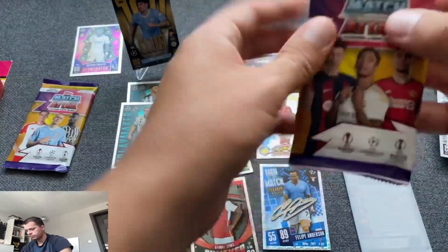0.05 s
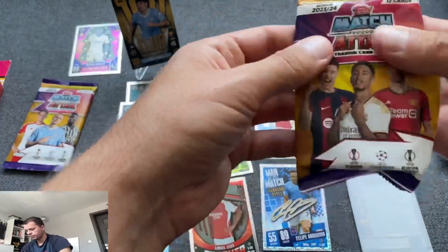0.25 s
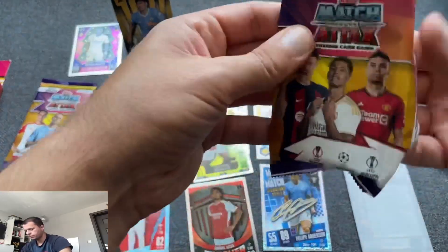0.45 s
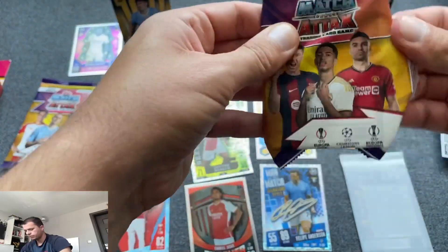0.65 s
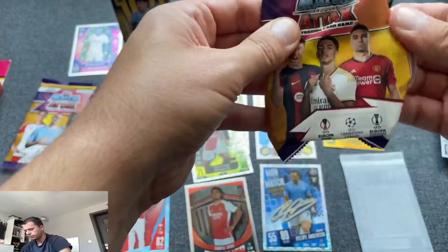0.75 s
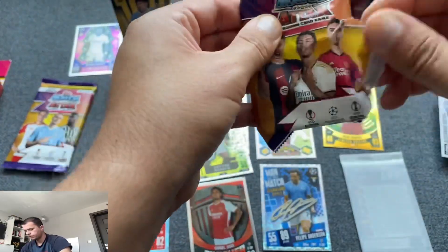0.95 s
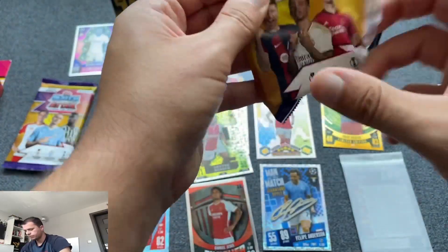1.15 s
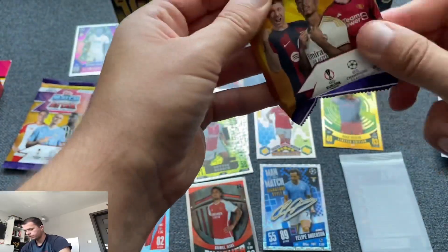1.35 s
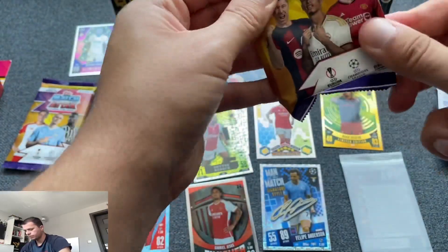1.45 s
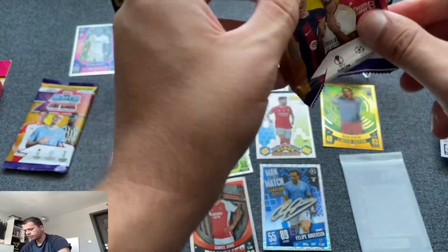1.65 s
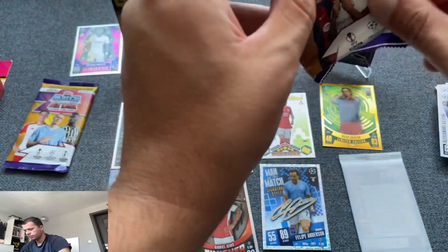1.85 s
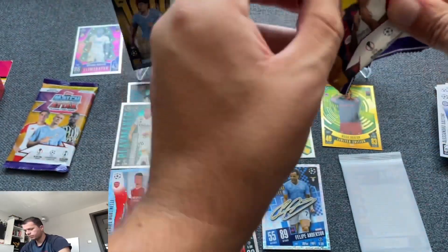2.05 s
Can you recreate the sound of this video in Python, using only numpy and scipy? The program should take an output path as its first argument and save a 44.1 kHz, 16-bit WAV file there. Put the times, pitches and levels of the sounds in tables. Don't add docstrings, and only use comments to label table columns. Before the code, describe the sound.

A foil packet crinkles and tears in the fingers, sharp irregular crackles close up in a quiet room

```python
import sys
import numpy as np
from scipy import signal
from scipy.fft import rfft, irfft, next_fast_len
from scipy.io import wavfile
from scipy.ndimage import uniform_filter1d

SR = 44100
rng = np.random.default_rng(int(sys.argv[2]) if len(sys.argv) > 2 else 0)


def volts(x):
    e = np.asarray(x, float) / 20
    return 10 ** e


def inscribe(sig):
    pcm = np.round(np.clip(np.atleast_2d(sig).T, -1, 1) * 32767)
    wavfile.write(sys.argv[1], SR, pcm.astype(np.int16))


N = 92610


def unit(x):
    return x / np.sqrt(np.mean(x ** 2) + 1e-20)


def along(points, hz):
    f, value = np.transpose(points)
    return np.interp(np.log(hz + 1), np.log(f + 1), value)


def over_time(points):
    return volts(np.interp(np.arange(N) / SR, *np.transpose(points)))


def filtered(x, response):
    size = next_fast_len(x.shape[-1] + 4096)
    return irfft(rfft(x, size) * response(np.fft.rfftfreq(size, 1 / SR)), size)[..., :x.shape[-1]]


def placed(starts, shapes):
    first = np.round(starts * SR).astype(int)[:, None]
    at = np.clip(first + np.arange(shapes.shape[-1]), 0, N)
    return np.array([np.bincount(at.ravel(), s.ravel(), N + 1)[:N] for s in shapes])


def ring(f, centre, wide):
    return 1j * f * centre * wide / (centre * centre - f * f + 1j * f * centre * wide)


# t/s, level/dB, colour f/Hz
GRIP_SNAPS = [(0.0896, -30, 3020), (0.0907, -38, 3050), (0.0939, -33.5, 4540), (0.2205, -29, 8400),
              (0.2378, -19.5, 7100), (0.2399, -28, 6500), (0.246, -23, 5000), (.2515, -21, 3000),
              (.255, -26, 4500), (.2608, -24, 6960), (0.2671, -16, 11600), (.2729, -26, 8200),
              (0.2907, -22.5, 1940), (0.397, -26, 6700), (.4167, -22, 3630), (0.423, -39, 4000),
              (0.4289, -34, 4500), (0.4398, -32, 3050), (0.4362, -23, 5740), (0.4902, -27, 8320),
              (0.4973, -28, 3300), (0.5121, -36, 2540), (0.5158, -22, 6800), (0.56, -21.5, 6760),
              (.6011, -27, 2820), (0.6064, -34, 3650), (0.6166, -23.5, 2640), (0.6237, -25, 4000),
              (0.6245, -22.5, 2330), (0.6277, -15, 4240), (0.6275, -16, 10700), (0.6423, -23.5, 4630),
              (0.6516, -22.5, 4470), (0.6552, -29, 5000)]
# t/s, level/dB, colour f/Hz
TEAR_SNAPS = [(.7298, -35.5, 6530), (0.7384, -32.5, 2510), (0.7472, -31, 5300), (0.766, -30, 8400),
              (0.776, -19, 4160), (0.7841, -12.5, 8500), (0.8245, -18.5, 5980), (0.8321, -17.5, 6100),
              (0.842, -26, 5900), (.8474, -31.5, 7280), (0.856, -36, 6900), (.861, -13.5, 6360),
              (0.8697, -18, 7400), (0.8893, -17.5, 4100), (0.8952, -19.5, 5000), (0.9, -27, 6500),
              (0.9094, -24.5, 4770), (0.9298, -19, 6700), (0.9403, -21.5, 4580), (0.9456, -13, 4000),
              (0.9482, -7, 3630), (0.9598, -16, 5900), (.9672, -22, 6700), (0.985, -34.5, 6400),
              (1.0232, -30.5, 2390), (1.0291, -17, 12600), (1.0297, -26, 1480)]
# t/s, level/dB, colour f/Hz
TURN_SNAPS = [(1.0943, -30, 6850), (1.0965, -37.5, 1500), (1.126, -27, 7600), (1.13, -29, 6840),
              (1.144, -32, 3000), (1.0565, -53, 3000), (1.069, -39, 7200), (1.084, -38, 4400),
              (1.121, -36.5, 1780), (1.165, -39.5, 1290), (1.1913, -23, 8300), (1.2521, -31.5, 5100),
              (1.2579, -33, 5300), (1.2605, -21, 5900), (1.3061, -23.5, 6500), (1.3527, -29, 5400),
              (1.3588, -34, 6600), (1.5182, -20.5, 9000), (1.5238, -24, 7100), (1.5499, -25.5, 8300),
              (1.619, -36, 6470), (1.6336, -22.5, 5750), (1.6575, -33, 2080), (1.7151, -37, 2240),
              (1.7314, -28, 3530), (1.738, -32, 2900), (1.7482, -22, 4100), (1.7495, -27.5, 2920),
              (1.7636, -28.5, 5730), (1.7782, -25.5, 4970), (1.8898, -32.5, 3220), (1.8964, -34, 6350),
              (1.9348, -25, 3980), (2.0574, -32, 6150)]
# t/s, level/dB, colour f/Hz
FAINT_TICKS = [(0.1314, -39.5, 4700), (.181, -44, 7100), (0.1916, -41.5, 2080), (.3373, -36, 6140),
               (0.3518, -30, 2720), (.3561, -35, 2600), (0.3593, -34, 5560), (0.3697, -30.5, 3660),
               (0.3811, -44, 1590), (.4096, -44, 5000), (.4682, -35.5, 2530), (.5291, -32, 1800),
               (0.663, -34, 1800), (0.7515, -35.5, 6260), (1.485, -51, 1170), (1.607, -46.5, 2600),
               (1.8739, -41.5, 1290), (2.0097, -45, 1480), (2.036, -48.5, 1510)]
# f/Hz, level/dB
FOIL_TONE = [(150, 5), (500, 3.5), (1500, 2), (4000, 0.5), (6500, -0.5), (9000, 2), (13000, 0.5),
             (16500, -6)]


def snaps():
    t60_s, rise_s, level_db = 0.008, 0.0003, -4.5
    panel_octaves, panel_wide, panel_db = 1.56, 0.13, -5
    start, db, hz = np.transpose(GRIP_SNAPS + TEAR_SNAPS + TURN_SNAPS + FAINT_TICKS)
    colour = hz[:, None]
    t = np.arange(512) / SR
    draw = rng.standard_normal((2, len(start), 513))
    away = panel_octaves * np.abs(draw[..., :1])
    low = np.clip(colour * 2 ** -away[0], 500, 15000)
    high = np.clip(colour * 2 ** away[1], 500, 15000)

    def tone(f):
        edge = 1.56 * colour
        thin = 1j * f / (0.16 * colour + 1j * f)
        flat = 0.31 * (edge / (edge + 1j * f)) ** 3 * thin
        panels = volts(panel_db) * (ring(f, low, panel_wide) + ring(f, high, panel_wide))
        return volts(along(FOIL_TONE, f)) * (flat + ring(f, colour, 1) + panels)

    burst = draw[..., 1:] * volts(-60 * t / t60_s) * (1 - np.exp(-t / rise_s))
    burst = filtered(burst, tone)
    early = np.sqrt(np.mean(burst[..., :44] ** 2, axis=-1, keepdims=True))
    return placed(start, volts(db + level_db)[:, None] * burst / early)


def grains(spectrum, hiss):
    grains_a_s, pitch_hz, spread, cycles, size_db = 3500, 5000, 0.917, 1.6, 22
    draw = rng.random((int(grains_a_s * N / SR), 6))
    t = np.arange(128) / SR
    octave = spread * 3.272 * (draw[:, 1] + draw[:, 2] - 1) / 1.497
    hz = np.clip(pitch_hz * np.exp(octave), 200, 16000)[:, None]
    size = volts(size_db * draw[:, 3:4] ** 2) * np.sqrt(hz)
    phase = draw[:, 4:].T[:, :, None]
    envelope = size * t * hz * np.exp(-t * hz / cycles * 2)
    shapes = envelope * np.sin(2 * np.pi * (hz * t + phase))
    mix = unit(placed(draw[:, 0] * N / SR, shapes)) + hiss * rng.standard_normal((2, N))
    return unit(filtered(mix, lambda f: volts(along(spectrum, f))))


def patchy(x):
    z = signal.stft(x, nperseg=256)[2]
    field = rng.standard_normal(z.shape[1:])
    field = uniform_filter1d(field, size=7, axis=0)
    field = uniform_filter1d(field, size=4, axis=1)
    patches = volts(3.5 * unit(field))
    return unit(signal.istft(z * patches, nperseg=256)[1][:, :N])


# centre t/s, half length t/s, level/dB
TEAR_SWELLS = [(0.094, 0.009, -44), (0.188, 0.019, -59.5), (0.22, 0.015, -50.5), (0.251, .014, -26),
               (0.278, 0.0088, -39), (0.293, 0.0073, -37), (0.341, 0.027, -39.5), (0.396, 0.0097, -37),
               (0.42, 0.015, -42), (0.485, 0.029, -43.5), (0.518, 0.0093, -46), (0.612, 0.015, -33),
               (0.631, 0.013, -38), (0.647, 0.021, -38.5), (0.719, 0.024, -56.5), (0.781, 0.015, -26.5),
               (0.826, 0.014, -29.5), (0.871, 0.012, -28), (0.904, 0.012, -30.5), (0.932, 0.0083, -35.5),
               (0.957, 0.011, -24)]
# centre t/s, half length t/s, level/dB
TURN_SWELLS = [(1.028, 0.0069, -39.5), (1.067, 0.02, -48.5), (1.133, 0.021, -45), (1.167, 0.015, -46),
               (1.204, 0.0071, -42), (1.258, 0.01, -38), (1.36, 0.0064, -48), (1.525, 0.0033, -33),
               (1.623, 0.022, -50), (1.644, 0.019, -35), (1.736, 0.0095, -36), (1.75, 0.0084, -40),
               (1.764, 0.008, -34), (1.781, 0.0045, -29.5), (1.889, 0.031, -51), (1.948, 0.0071, -47),
               (2.055, 0.0086, -41.5)]
# t/s, level/dB
GRIP_RUSTLE = [(0, -62), (.05, -67.5), (.16, -63.5), (.21, -73), (.32, -52), (.5, -45.5), (.55, -51.5),
               (.71, -63), (.8, -49), (1.05, -52.5), (1.2, -57), (1.36, -55.5), (1.44, -70.5),
               (1.49, -60.5), (1.85, -54.5), (1.99, -64.5), (2.1, -54)]
# f/Hz, level/dB
RUSTLE_TONE = [(60, 20), (250, 17), (1000, -1), (4000, -5.5), (9000, 3.5), (16000, -11)]
# t/s, treble level/dB
FOIL_FACING = [
    (.26, 7.5),
    (.6, -15),
    (.85, 7),
    (1.3, 3),
    (1.7, -5),
]


def crackle():
    facing_hz, rise_share = 4000, 0.75
    t = np.arange(N) / SR
    swells = np.zeros(N)
    for centre, half, db in TEAR_SWELLS + TURN_SWELLS:
        length = half * np.where(t < centre, rise_share, 1)
        swells += volts(db) * np.exp(-((t - centre) / length) ** 2)
    fine = swells * patchy(grains(FOIL_TONE, hiss=1))
    fine = fine + over_time(GRIP_RUSTLE) * grains(RUSTLE_TONE, hiss=0.63)
    dull = filtered(fine, lambda f: 1 / (1 + (f / facing_hz) ** 2))
    return dull + over_time(FOIL_FACING) * (fine - dull)


def pushes(table, cycles):
    out, t = np.zeros((2, N)), np.arange(N) / SR
    for centre, db, hz in table:
        turns = (t - centre) * hz
        swing = np.sin(2 * np.pi * (turns + rng.random((2, 1))))
        out += volts(db) * np.exp(-(turns / cycles) ** 2) * swing
    return out


# centre t/s, level/dB, pitch f/Hz
POUCH_PUFFS = [(.226, -28, 1930), (.2895, -24.5, 700), (.2925, -24.5, 650), (.304, -29, 1200),
               (.5957, -33.5, 910), (.778, -26, 660), (.789, -22.5, 438), (.862, -25, 545),
               (.949, -13.5, 1180), (.9802, -21.5, 1170), (1.024, -28.5, 404), (1.057, -35, 1200),
               (1.2035, -37.5, 342), (1.2063, -30, 1170), (1.3075, -30.5, 980), (1.31, -36, 400),
               (1.3461, -39, 1100), (1.5265, -31, 430), (1.658, -42, 1520), (1.778, -33.5, 870),
               (1.873, -45, 800), (1.935, -37, 1280), (1.95, -38, 1000), (2.028, -44, 825)]


def puffs():
    return pushes(POUCH_PUFFS, cycles=0.65)


# centre t/s, level/dB, pitch f/Hz
HAND_THUMPS = [(.005, -37.5, 55), (.03, -48.5, 60), (.13, -50, 65), (.35, -37.5, 151), (.425, -37.5, 90),
               (.445, -34.5, 143), (.486, -34.5, 109), (.498, -27, 78), (.636, -53, 103),
               (.792, -32.5, 126), (.903, -34.5, 143), (1.033, -33.5, 136), (1.082, -35.5, 221),
               (1.17, -37, 206), (1.206, -48, 65), (1.265, -37.5, 200), (1.272, -38, 92.4),
               (1.641, -40, 152.5), (1.761, -40, 122), (1.916, -41, 143), (2.068, -40.5, 184)]


def thumps():
    return pushes(HAND_THUMPS, cycles=0.38)


# f/Hz, time to fall 60 dB t/s
WALL_T60 = [(300, 0.17), (12000, 0.17)]


def walls(x):
    stretch, delay = 8192, 90
    out = np.zeros((2, N + SR))
    for start in range(0, N, stretch):
        hz, t, z = signal.stft(rng.standard_normal((2, SR // 4)), SR, nperseg=256)
        fade = volts(-60 * t / along(WALL_T60, hz)[:, None])
        tail = signal.istft(z * fade, SR, nperseg=256)[1]
        wet = signal.fftconvolve(x[:, start:start + stretch], tail / np.linalg.norm(tail[0]), axes=1)
        out[:, start + delay:start + delay + wet.shape[1]] += wet
    return volts(-14.5) * out[:, :N]


# f/Hz, level/dB
ROOM_COLOUR = [(60, 16), (200, -21), (800, -42.5), (16000, -24)]


def room_tone():
    noise = rng.standard_normal((2, N))
    return volts(-66) * unit(filtered(noise, lambda f: volts(along(ROOM_COLOUR, f))))


# f/Hz, phase [radians]
PORT_TURN = [(2000, .1), (2900, 1), (5000, 1), (5800, -1.2), (7800, -2.95), (9700, -3.4), (12900, -6.1),
             (16500, -6.3)]


def ports(pair, alike):
    def shares(hz):
        half = np.arccos(np.clip(along(alike, hz), 0, 1)) / 2
        return np.array([np.cos(half), np.sin(half)])

    def turn(hz):
        return np.exp(0.5j * np.outer([1, -1], along(PORT_TURN, hz)))

    same, different = filtered(pair, shares)
    return filtered(np.array([same + different, same - different]), turn)


# f/Hz, likeness [0 to 1]
SOFT_ALIKE = [(2000, .935), (4000, .75), (5600, .5), (7800, .98), (9600, .975), (10500, .7), (13000, .975)]
# f/Hz, likeness [0 to 1]
SHARP_ALIKE = [(2000, .935), (4000, .75), (5600, .55), (8700, .78), (10500, .7), (13000, .97)]


def scene():
    sharp = snaps()
    soft = crackle() + puffs()
    around = walls(soft + sharp) + thumps() + room_tone()
    return ports(sharp, SHARP_ALIKE) + ports(soft + around, SOFT_ALIKE)


def roll_off(x):
    return signal.sosfilt(signal.butter(12, 16990, fs=SR, output="sos"), x)


def record(dry):
    low_hz, top_hz, top_steep, left_db = 55, 15800, 70, 0.35

    def band(hz):
        bass = (1j * hz / (low_hz + 1j * hz)) ** 2
        return bass / (1 + (hz / top_hz) ** top_steep)

    mix = filtered(dry, band) * volts([[left_db], [-left_db]])
    return roll_off(mix)


dry = scene()
out = record(dry)
inscribe(out)
```